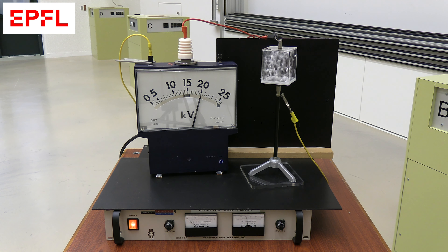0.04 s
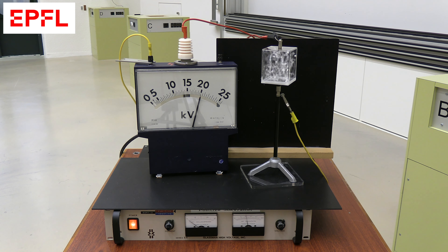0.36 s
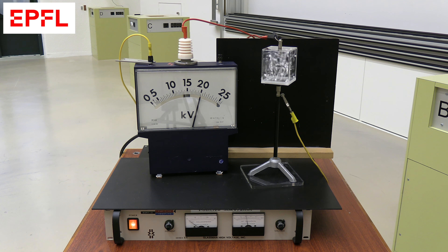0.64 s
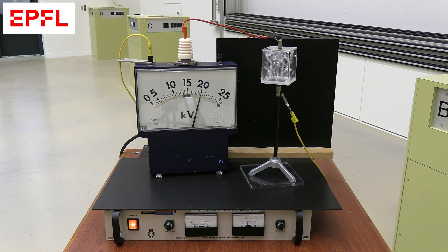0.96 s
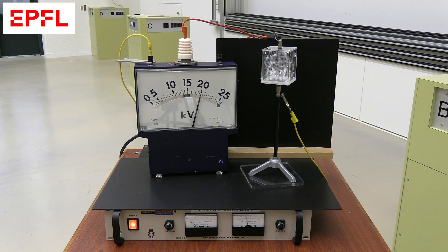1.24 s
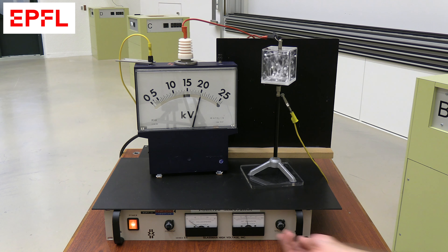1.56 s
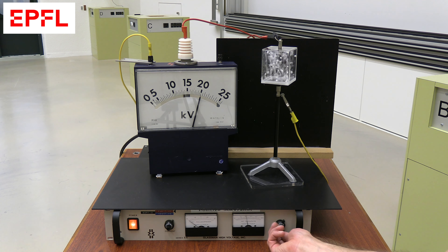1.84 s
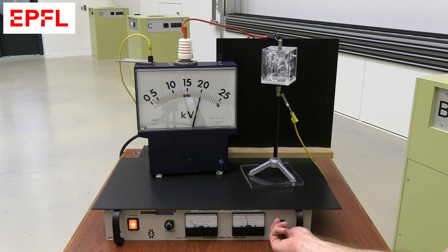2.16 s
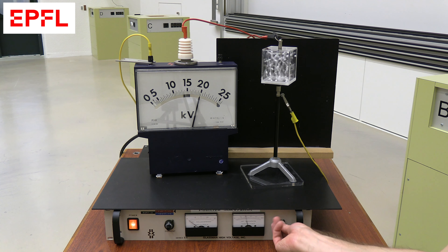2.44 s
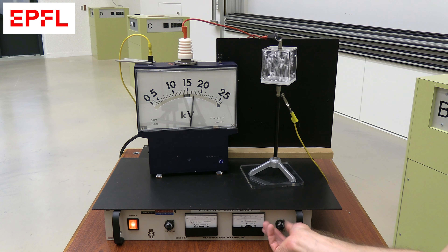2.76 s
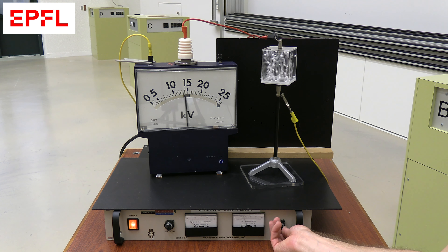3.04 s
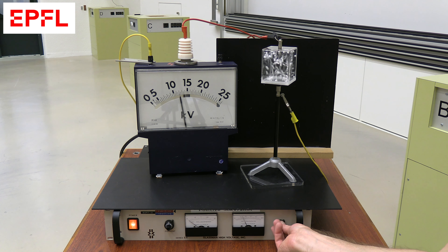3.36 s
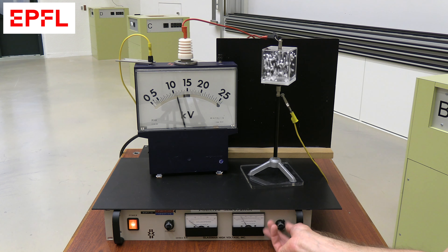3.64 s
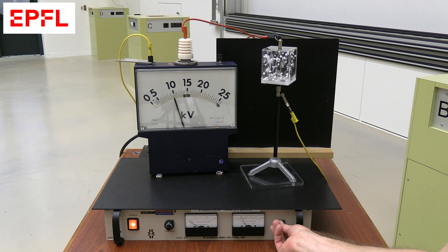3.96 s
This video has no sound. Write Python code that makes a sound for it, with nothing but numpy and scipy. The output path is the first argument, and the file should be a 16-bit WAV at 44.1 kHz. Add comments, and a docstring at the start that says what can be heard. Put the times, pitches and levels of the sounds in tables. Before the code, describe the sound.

Light beads crackle rapidly against plastic walls with a fine spark sizzle, in an echoing room with humming equipment and rushing ventilation. Soft handling rumbles come in, then a low bump near the microphone, and the crackling grows quieter.

```python
"""In a lecture room, light beads dance between high-voltage electrodes in a clear plastic box.
Each hit is a tiny click that makes the walls ring, and small sparks add a fine sizzle.
Both echo in the room and ease off near the end, as the voltage is turned down.
Behind them the ventilation rushes and the power supply hums.
Soft handling rumbles come and go, and one dull, low bump sounds close by."""
import sys
import numpy as np
from scipy import signal
from scipy.fft import rfft, irfft
from scipy.io import wavfile
from scipy.ndimage import uniform_filter1d

SR = 44100
rng = np.random.default_rng(int(sys.argv[2]) if len(sys.argv) > 2 else 0)


def wav_out(sig):
    """Save sig, one row per channel (or a flat mono array), as 16-bit PCM at SR to the path in sys.argv[1]."""
    wavfile.write(sys.argv[1], SR, np.round(np.clip(np.atleast_2d(sig).T, -1, 1) * 32767).astype(np.int16))


N = 176400  # 4 seconds

# How alike reflected sound is on the left and right: pitch_hz, likeness (0 to 1)
STEREO_LIKENESS = [(100, 0.46), (800, 0), (1250, 0.68), (1800, 1), (2900, 0.56), (5000, 0.84), (9000, 0),
                   (12000, 0)]


def amp(db):
    """Turns decibels into a number to multiply by."""
    return 10 ** (np.asarray(db) / 20)


def unit(x):
    """Scales a signal to an average power of 1."""
    return x / np.sqrt(np.mean(x ** 2) + 1e-20)


def read(points, hz):
    """Reads between the rows of a table, on a log scale of pitch."""
    pitches, values = np.transpose(points)
    return np.interp(np.log(hz + 1), np.log(pitches + 1), values)


def bins(size):
    """The frequencies in a spectrum of this many samples."""
    return np.fft.rfftfreq(size, 1 / SR)


def add(mix, start_s, sound):
    """Mixes in a stereo sound at the given time."""
    part = mix[:, round(start_s * SR):][:, :sound.shape[1]]
    part += sound[:, :part.shape[1]]


def sharp_click(db):
    """The sharpest click that has this spectrum (minimum phase)."""
    cepstrum = irfft(db * np.log(10) / 20)
    half = cepstrum.shape[-1] // 2
    cepstrum[..., 1:half] *= 2
    cepstrum[..., half + 1:] = 0
    return irfft(np.exp(rfft(cepstrum)))


def convolve(x, response):
    """Makes every sample of x ring with the given response."""
    return signal.fftconvolve(x, response, axes=1)[:, :N]


def coloured(x, points):
    """Changes the tone by a table of pitches and levels."""
    return convolve(x, sharp_click(read(points, bins(256)))[None])


def noise(db):
    """Two unrelated channels of noise with this spectrum."""
    return unit(irfft(rfft(rng.standard_normal((2, N))) * amp(db), N))


def wander(hz):
    """A random curve that moves mostly slower than hz."""
    return noise(-40 * np.log10(1 + (bins(N) / hz) ** 2))[0]


def diffuse(size):
    """Noise from all sides: left and right are close in the middle range, unrelated at the top."""
    left, other = rfft(rng.standard_normal((2, size)))
    same = np.clip(read(STEREO_LIKENESS, bins(size)), 0, 1)
    right = same * left + np.sqrt(1 - same ** 2) * other
    return irfft(np.array([left, right]), size)


def ventilation(level_db=-61.5):
    """Moving air fills the room with a steady, low rush."""
    # Tone of the rush: pitch_hz, relative_db
    tone = [(10, 11.5), (25, -2), (60, 1.5), (130, -2), (175, -6), (250, 1), (340, -8), (460, -14),
            (700, -15), (1000, -19.5), (3000, -21), (15000, -43)]
    return amp(level_db) * unit(irfft(rfft(diffuse(N)) * amp(read(tone, bins(N))), N))


def supply_hum():
    """The power supply and its fans hold a few steady tones."""
    # Hum tones: pitch_hz, left_db, right_db, right_lag_rad
    tones = [(99.9, -61.5, -54.5, 0.81), (143.3, -78, -78, 0.83), (183.5, -77, -112, 1),
             (206.6, -105, -80, 0.59), (306, -82, -116, 0.67), (506, -98, -86, 1)]
    t, out = np.arange(N) / SR, np.zeros((2, N))
    for hz, left_db, right_db, lag in tones:
        phase = 2 * np.pi * (hz * t + rng.random()) - np.array([[0], [lag]])
        out += np.sqrt(2) * amp([[left_db], [right_db]]) * np.sin(phase)
    return out


def handling_rumbles():
    """Soft handling makes low shudders that swell and die away."""
    # Shudders: start_s, rise_s, decay_s, level_db, pitch_hz, width_hz
    shudders = [(2.29, 0.025, 0.084, -47, 62, 40), (2.5, 0.086, 0.34, -49.5, 30.3, 19),
                (2.89, 0.024, 0.03, -52, 252, 38), (3.09, 0.061, 0.19, -38.5, 28.5, 9.6),
                (3.115, 0.021, 0.034, -56.5, 221, 100), (3.236, 0.0089, 0.034, -31.5, 58.4, 100),
                (3.5, 0.041, 0.48, -56.5, 28, 20), (3.68, 0.03, 0.024, -52, 248, 27),
                (3.92, 0.023, 0.15, -51, 34.8, 33)]
    t, out = np.arange(N) / SR, np.zeros((2, N))
    for start, rise, decay, db, hz, width in shudders:
        shared, opposite = noise(-20 * np.log10(1 + ((bins(N) - hz) / (width / 2)) ** 2))
        swell = np.clip((t - start) / rise, 0, 1) * np.exp(-np.maximum(t - start - rise, 0) / decay)
        out += amp(db) * swell * unit(np.array([0.4 * shared - opposite, 0.42 * shared + opposite]))
    return out


def dull_bump(rise_s=0.0066, top_hz=375, knock_hz=530, knock_rise_s=0.0021):
    """A soft blow close by and its rebounds ring a few low tones, with a faint higher knock."""
    # Ringing tones: pitch_hz, relative_db, ring_s (time to fall 60 dB), right_lag_rad
    tones = [(46, -30, 0.17, 3), (80, -17, 0.043, 3), (151, -49, 0.34, -3.1), (208.5, -18.5, 0.046, 1.43),
             (277, -34.5, 0.085, 1.6), (322, -22, 0.02, 3.3)]
    # The blow and its rebounds: start_s, gain_db
    blows = [(3.2151, 4), (3.2362, -10.5), (3.2617, -31)]
    t, out, ring = np.arange(SR // 2) / SR, np.zeros((2, N)), 0
    for hz, db, ring_s, lag in tones:
        phase = 2 * np.pi * hz * t - np.array([[-lag], [lag]]) / 2
        ring += amp(db - 60 * t / ring_s) * np.sin(phase)
    lowpass = signal.butter(8, top_hz, fs=SR, output="sos")
    ring = signal.sosfilt(lowpass, ring * np.minimum(t / rise_s, 1))
    swell = (t / knock_rise_s) ** 2 * np.exp(1 - t / knock_rise_s)
    knock = amp(-62.5) * swell * np.sin(2 * np.pi * knock_hz * t)
    for start, db in blows:
        add(out, start, amp(db) * (knock - ring))
    return out + amp(-21.5) * room_echo(out, patterns=1)


def room_echo(x, size=22000, patterns=3, gain_db=-6.5):
    """The room rings on after each sound; the echo pattern changes from moment to moment."""
    # How long the room rings: pitch_hz, ring_s (time to fall 60 dB)
    ring_times = [(200, 0.99), (1600, 0.49), (5000, 1), (15000, 0.67)]
    t, out = np.arange(size) / SR, 0
    chosen = rng.integers(0, patterns, N)[np.arange(N) // 512]
    for k in range(patterns):
        hz, when, spectrum = signal.stft(diffuse(size), SR, nperseg=256)
        fade = amp(-60 * when / read(ring_times, hz)[:, None])
        tail = signal.istft(spectrum * fade, SR)[1][:, :size] * (t > .005)
        share = uniform_filter1d(1. * (chosen == k), size=256).clip(0)
        out += convolve(x * np.sqrt(share), unit(tail) / np.sqrt(size))
    return amp(gain_db) * out


def box_echoes(x, paths=8, size=512, fade_s=0.0024, gain_db=-5.5):
    """Each tick bounces about in the box for a few milliseconds, by a path that keeps changing."""
    t, out = np.arange(size) / SR, x.copy()
    chosen = rng.integers(0, paths, N)[np.arange(N) // 128]
    for k in range(paths):
        echoes = diffuse(size) * np.exp(-t / fade_s) * (t > .0002)
        out += convolve(x * (chosen == k), amp(gain_db) * unit(echoes) / np.sqrt(size))
    return out


def box_ring(x, right_lead_s=.000025):
    """The plastic walls ring after every tick and send each pitch more to one side."""
    # What the box lets out: pitch_hz, relative_db
    tone = [(60, -41.5), (500, -24.5), (1050, -25.5), (1400, -9.5), (1800, -7), (2100, -13.5), (2530, -15),
            (2800, -2), (3800, -5), (5400, -5), (7500, -0.9), (10400, -1.9), (11300, -4), (13000, -6),
            (15800, -16.5)]
    # Pitches at which the walls ring: pitch_hz, width_hz, lift_db
    walls = [(710, 55, 10.5), (1269, 28, 10), (1475, 59, 10), (1644, 102, 16), (2760, 240, 4.5),
             (3416, 146, 4.5), (4180, 480, 6.5), (4896, 430, 5.5), (5970, 240, 3), (8750, 270, 5.5),
             (9820, 220, 2.5), (10400, 230, 3.5)]
    # Balance between the sides: pitch_hz, left_minus_right_db
    balance = [(500, 5), (1500, 4.5), (2300, 5), (3000, 7.5), (4200, 10), (5300, 7), (6500, 2),
               (8000, -7.5), (8800, -9.5), (10400, -4.5), (11200, -2), (12000, 13), (13400, -1),
               (15500, 44)]
    hz, lift = bins(4096), 1
    for pitch, width, db in walls:
        offset = (hz - pitch) / width
        lift += (amp(db) ** 2 - 1) / (1 + (2 * offset) ** 2) / (1 + (offset / 1.54) ** 2)
    sides = amp(np.outer([.5, -.5], read(balance, hz)))
    sides /= np.sqrt((sides ** 2).mean(0))
    response = sharp_click(read(tone, hz) + 10 * np.log10(np.maximum(lift, .1)) + 20 * np.log10(sides))
    out = convolve(x, response / np.sqrt((response ** 2).sum() / 2))
    out[1] = irfft(rfft(out[1]) * np.exp(2j * np.pi * bins(N) * right_lead_s), N)
    return out


def voltage_drive():
    """How lively the voltage makes the beads at each moment, in decibels."""
    # Liveliness of the beads: time_s, relative_db
    liveliness = [(0, -0.5), (.7, -0.06), (.93, -0.9), (1.3, -1.8), (2.0, 0.5), (2.35, -0.7), (2.75, 0),
                  (3.15, -1.44), (3.35, -6.5), (3.7, -6), (4, -9.5)]
    return np.interp(np.arange(N) / SR, *np.transpose(liveliness))


def spark_sizzle(activity_db, hits, sparks_per_s=5400, contact_share=0.26, contact_s=0.0061):
    """Tiny sparks come in spurts, some set off as beads touch an electrode."""
    # Tone of the sparks before the box: pitch_hz, gain_db
    tone = [(1000, -10.5), (2500, -0.5), (6000, -1.5), (10000, -4.5), (13000, 2)]
    sparks = (rng.random((2, N)) < sparks_per_s / SR) * rng.standard_normal((2, N))
    fade = np.exp(-1 / (contact_s * SR))
    contact = signal.lfilter([1], [1, -fade], (hits ** 2).mean(0))
    steady = amp(0.71 * activity_db) ** 2  # falls less than the hits do
    power = contact_share * contact / contact.mean() + (1 - contact_share) * steady / steady.mean()
    spurts = amp(1.83 * wander(hz=21.7))
    return coloured(amp(-53.5) * unit(sparks * np.sqrt(power) * spurts), tone)


def bead_pings(activity_db, count=400, size=512, pitch_spread=0.016, spread_db=3.2):
    """Some beads land just right to ring one pitch alone, a little differently each time."""
    # Streams of pings: pitch_hz, swell_s, pings_per_s, relative_db
    streams = [(1633, 0.00034, 50, -68.5), (2904, 0.00059, 22, -69.5), (4114, 0.00091, 32, -73.5),
               (5010, 0.00087, 40, -69), (5910, 0.0011, 16, -70.5), (9200, 0.00086, 43, -67.5),
               (10000, 0.00055, 35, -70)]
    t, out = np.arange(size) / SR, np.zeros((2, N))
    for hz, swell, rate, db in streams:
        starts = np.cumsum(rng.gamma(2, size=count)) / (2 * rate)  # loosely even gaps
        variations = rng.standard_normal((count, 3)).clip(-2, 2)
        for start, (detune, strength, skew) in zip(starts[starts < (N - 1) / SR], variations):
            pitch = hz * (1 + pitch_spread * detune)
            lag = np.array([[0], [skew * (1 - read(STEREO_LIKENESS, hz))]])
            ring = unit(t * np.exp(-t / swell) * np.sin(2 * np.pi * pitch * t - lag))
            gain = amp(db + spread_db * strength + activity_db[int(start * SR)])
            add(out, start, gain * np.sqrt(SR / size / rate) * ring)
    return out


def hard_hits(size=1024):
    """Single hard hits, some hollow and some bright; each bead chatters briefly against the wall."""
    # The hardest hits: start_s, relative_db, hollow_db, bright_db, chatter_s
    hits = [(0.0209, -17, 8, -10, 0.00096), (0.136, -26, 4, 14, 0.00085), (0.1979, -16, -4, 1, 0.0005),
            (0.2401, -17.5, 5, 2, 0.0015), (0.3621, -13, 1, 4, 0.00043), (0.59, -23, 12, 12, 0.0017),
            (0.6072, -16, 3, -5, 0.00083), (0.673, -21, -8, 7, 0.002), (0.687, -17, -14, 1.5, 0.0005),
            (0.746, -15.5, 9.5, -3, 0.00039), (0.7927, -17.5, 3.5, -3, 0.001),
            (0.823, -32, -16, 16, 0.00056), (0.9812, -11.5, -12, -2.5, 0.00041),
            (0.9923, -22.5, 11, -3, 0.0018), (1.0473, -18.5, 0, 6, 0.0025), (1.2399, -18.5, 3, 6.5, 0.0005),
            (1.3706, -17, -6, 0, 0.0005), (1.451, -24, 12.5, 9, 0.001), (1.4911, -15.5, -3, -2, 0.0005),
            (1.5632, -15.5, 2.5, -4, 0.00036), (1.5948, -26, -15, 9, 0.0005), (1.6406, -18.5, 5, 0, 0.0027),
            (1.7692, -17.5, 8, -3, 0.0012), (1.8106, -16, -9, -17, 0.0031), (1.874, -25.5, 9, -10, 0.0015),
            (1.9998, -15, -18, -2, 0.00083), (2.0611, -22.5, 12, -1, 0.001),
            (2.3399, -22.5, 13, -15, 0.0015), (2.4429, -12, -3.5, -3, 0.00089),
            (2.458, -19, -14, 2, 0.00054), (2.5344, -12.5, 0.5, -5, 0.0027), (2.561, -18, -10, -5, 0.00074),
            (2.7253, -29, 19, -11, 0.0018), (2.7392, -15, -7, -11, 0.0013), (2.7566, -16, -2, -7, 0.001),
            (2.7701, -12.5, -2, -6, 0.002), (2.8205, -15, 3, -7, 0.0033), (3.0052, -17, -5, 1, 0.0005),
            (3.1227, -19, 10.5, 2, 0.001), (3.1789, -20, 7, 5, 0.002), (3.2794, -16, 2, -9, 0.0012),
            (3.4204, -28.5, -6, 7.5, 0.002), (3.5342, -27, 9, -1, 0.0017), (3.5396, -22, -13, -4, 0.0005),
            (3.6586, -22, -2.5, -4, 0.00046), (3.6752, -20, 6.5, -9, 0.0013),
            (3.794, -28.5, 12.5, -4, 0.0016), (3.8268, -30, 12, 1, 0.001), (3.8532, -22, -14, -3, 0.00054),
            (3.876, -36, 4, 0, 0.00044), (3.9003, -22, 2, -5, 0.001), (3.9122, -21, 4, -7, 0.00062),
            (3.9232, -24, -2, -2, 0.0005)]
    t, out = np.arange(size) / SR, np.zeros((2, N))
    for start, db, hollow_db, bright_db, chatter_s in hits:
        rebounds = amp(2.5) * unit(diffuse(size) * np.exp(-t / chatter_s)) / np.sqrt(size)
        # The first touch and its rebounds spread the tick in time but keep its tone.
        smear = np.exp(1j * np.angle(rfft((t == 0) + rebounds)))
        tone = [(1800, hollow_db), (3000, 0.011), (5500, 0.017),
                (8000, bright_db), (13000, bright_db - 4)]
        tick = sharp_click(read(tone, bins(size)))
        add(out, start, amp(db - 4) * irfft(rfft(tick) * smear)[:, :size // 2])
    return out


def wall_ticks(spots, spread_db=4.5, order=10):
    """Every spot on the walls has its own tick, a little different on each side."""
    hz = bins(128)
    ripples = np.cos(np.pi * np.arange(1, order + 1)[:, None] * np.sqrt(hz / hz[-1]))
    ripples /= np.sqrt(order / 2)
    shared = rng.standard_normal((spots, 1, order)) @ ripples
    apart = rng.standard_normal((spots, 2, order)) @ ripples
    ticks = sharp_click(spread_db * (shared + (1 - read(STEREO_LIKENESS, hz)) * apart))
    return ticks / np.sqrt((ticks ** 2).sum((1, 2), keepdims=True) / 2)


def landing_tone(hits, dull_hz=2360, dull_share=0.15):
    """Slower beads land more softly: as the voltage falls, the lows fade less than the treble."""
    # Tone of the hits before the box: pitch_hz, gain_db
    tone = [(1000, 4), (1600, 0), (3000, 1), (6000, -2), (10000, -3), (13000, -7.5)]
    lows = irfft(rfft(hits) / (1 + (bins(N) / dull_hz) ** 6), N)
    return coloured(hits + lows * (amp(-dull_share * voltage_drive()) - 1), tone)


def bead_hits(activity_db, spots=400, full_hits_per_s=900, spread_db=3.5):
    """Beads strike the walls at random, less often and more gently as the voltage falls."""
    rate_share = 0.55  # the part of a level change that comes from the number of hits
    ticks = wall_ticks(spots)
    chance, spot = rng.random(N), rng.integers(0, spots, N)
    strength = amp(spread_db * np.minimum(rng.standard_normal(N), 1.8) + (1 - rate_share) * activity_db)
    hits_per_s = full_hits_per_s * amp(rate_share * activity_db) ** 2
    out = np.zeros((2, N))
    for i in np.flatnonzero(chance < hits_per_s / SR):
        add(out, i / SR, strength[i] * ticks[spot[i]])
    return amp(-50.5) * unit(out)


def scene():
    """The crackling box in its room, over hum, ventilation, soft rumbles and a dull bump."""
    activity_db = voltage_drive() + 0.28 * wander(hz=4.1)  # small chance swells
    hits = bead_hits(activity_db)
    ticks = landing_tone(hits) + hard_hits() + spark_sizzle(activity_db, hits)
    ticks = box_echoes(ticks) + bead_pings(activity_db)
    crackle = amp(-2.0) * box_ring(ticks + room_echo(ticks))
    return crackle + supply_hum() + ventilation() + handling_rumbles() + dull_bump()


def record(dry):
    """Cuts away the very highest treble."""
    top_hz = 15850
    lowpass = signal.firwin(511, top_hz, window=("kaiser", 9), fs=SR)
    return signal.oaconvolve(dry, lowpass[None], "same")


dry = scene()
out = record(dry)
wav_out(out)
```